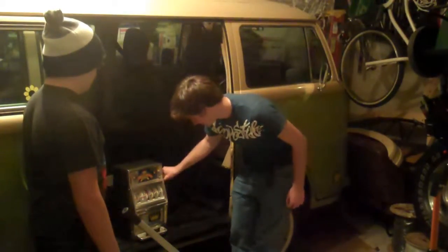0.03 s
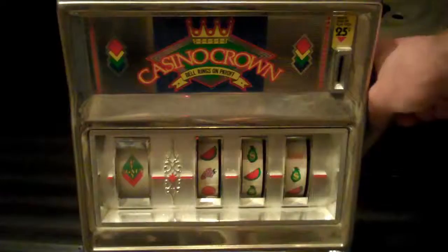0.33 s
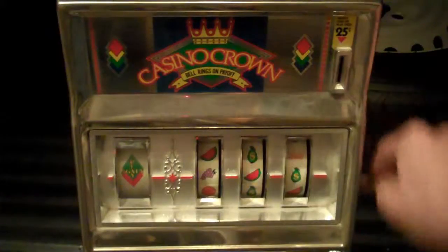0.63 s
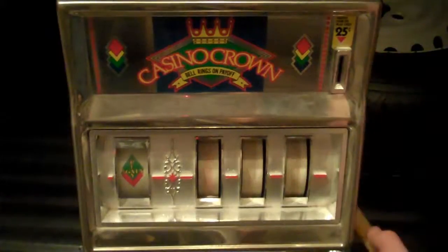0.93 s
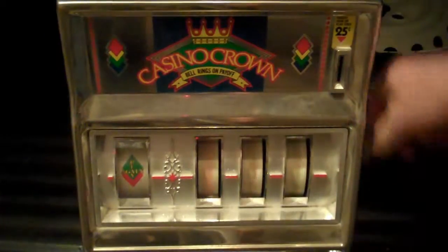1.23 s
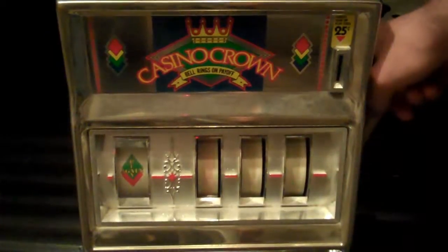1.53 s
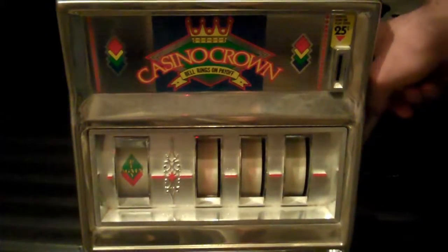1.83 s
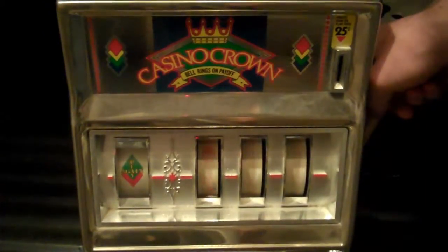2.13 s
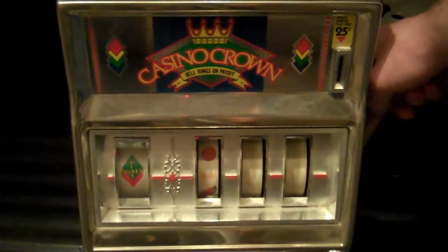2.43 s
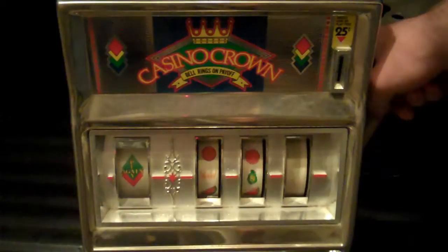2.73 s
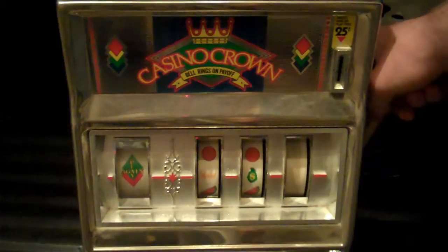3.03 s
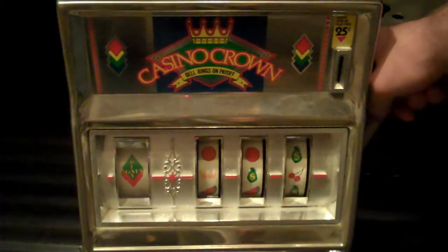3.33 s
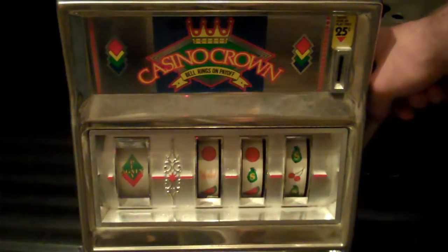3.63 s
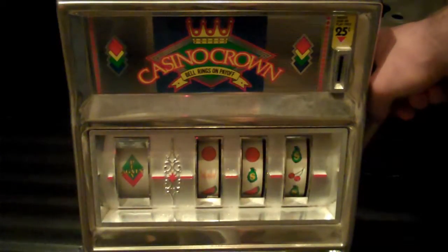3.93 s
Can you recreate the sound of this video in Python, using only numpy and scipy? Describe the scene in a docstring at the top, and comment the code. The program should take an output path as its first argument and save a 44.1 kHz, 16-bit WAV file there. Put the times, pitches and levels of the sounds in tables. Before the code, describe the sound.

A small mechanical slot machine is played, heard close in a quiet garage. From 0.5 seconds the lever ratchets with tiny spring pings, tripping with a loud clack near 0.9. A bright, rattling whirr rises with a thin squeal, and the lever rubs and knocks back at 1.3. Three reels stop in turn with slowing ticks starting around 2, 2.4 and 3 seconds, while the whirr continues to 4.

```python
"""A garage, with a stereo microphone close to a small mechanical slot machine; the left side is brighter.
The lever ratchets down, trips the spring with a clack, then rubs and knocks back home.
Three reels whirr on a squealing shaft. One by one each ticks against its pawl, ever slower,
and rocks to rest. Ticks and blows ring the cabinet; the loudest peaks overload the microphone."""
import sys
import numpy as np
from scipy import signal
from scipy.fft import rfft, irfft
from scipy.io import wavfile

SR = 44100
rng = np.random.default_rng(int(sys.argv[2]) if len(sys.argv) > 2 else 0)


def store_wav(level_fs):
    """Save 16-bit WAV to argv[1]."""
    pcm = np.round(np.clip(np.atleast_2d(level_fs), -1, 1) * 32767)
    wavfile.write(sys.argv[1], SR, pcm.T.astype(np.int16))


N = 176400

# The stereo image at the microphone. Each row: frequency in Hz, left over right in dB.
LEFT_LEAN = [(60, 1), (200, 4), (1000, 4.7), (2000, 3.2), (3200, 4.7), (5300, 1.8), (6200, 0.54),
             (7200, 19.2), (9000, 15.2), (13500, 25)]
# How alike the two sides are. Each row: frequency in Hz, coherence from 0 to 1.
COHERENCE = [(60, 0.25), (200, 0.84), (700, 0.87), (1900, 0.81), (3100, 0.59), (5000, 0.53), (8200, 0.6),
             (13500, 0.42)]
# The garage's background. Each row: frequency in Hz, relative level in dB.
ROOM_COLOUR = [(15, -43), (25, -24), (65, -5), (99, -9), (159, -7), (187, -12), (263, -5.5), (300, -11),
               (325, -10), (988, -9.5), (1770, -15.5), (13900, -28)]
# Faint whines in the garage. Each row: frequency in Hz, width in Hz, lift in dB.
ROOM_WHINES = [(4550, 65, 6), (8320, 72, 10)]

# Blows of lever, ratchet and spring. Each row: start in seconds, then body, clack, snap and sizzle
# in relative dB.
LEVER_BLOWS = [(0.5, -39.5, -42, -35, -65), (0.604, -37, -33, -20.5, -39.5), (0.617, -34.5, -41, -21, -51),
               (0.656, -45, -54, -40, -72), (0.697, -33, -26, -28, -52), (0.723, -38, -37, -23, -53),
               (0.738, -35.5, -27, -28, -44), (0.763, -32.5, -46, -29, -42), (0.776, -38, -61, -30, -42),
               (0.79, -34.5, -31, -22.5, -37), (0.826, -26.5, -24, -17.5, -21),
               (0.851, -21.5, -28, -8.5, -30), (0.859, -18.5, -10, -1, -26), (0.879, -30, -19, -5, -17.5),
               (1.302, -29.5, -18, -9, -25.5), (1.306, -29, -22, -8.5, -24.5)]
# The centres of those four bands, in Hz.
LEVER_BANDS_HZ = [900, 2800, 6000, 11500]
# The spectrum of a lever blow. Each row: frequency in Hz, relative level in dB.
LEVER_COLOUR = [(35, -25), (60, -13), (210, -15), (573, -6.5), (883, 0), (1270, -4), (2150, -4),
                (2350, -0.5), (3880, -7), (5460, -2.5), (6410, -4.5), (7350, -1), (9880, -15.5),
                (13900, -22.5)]
# The lever's resonances. Each row: frequency in Hz, width in Hz, lift in dB.
LEVER_RESONANCES = [(1023, 75, 4.6), (2410, 58, 2.4), (5870, 140, 3.8), (6670, 110, 4.7), (7430, 150, 3.2)]
# The cabinet's modes. Each row: pitch in Hz, seconds to fall 60 dB, then the dB added to the body level
# of a tick and of a lever blow.
CABINET_MODES = [(125.5,0.45,-25.5,-18),(221,0.27,-16.5,-14),(421.6,0.18,-15,-11),(757,0.075,15,0)]
# The mechanism's rumble. Each row: time in seconds, relative level in dB.
RUMBLE_LEVELS = [(.55,-56.5),(.72,-44.5),(.9,-41),(1.1,-48),(1.38,-46.5),(1.85,-55.5),(2.15,-42.5),(2.36,-49.5),(2.6,-42.5),(2.93,-51.5),(3.15,-47),(3.5,-57),(4,-57)]
# Its spectrum. Each row: frequency in Hz, relative level in dB.
RUMBLE_COLOUR = [(30,-25),(80,-27),(118,-3.5),(162,-14.5),(217,2),(330,-11.5),(440,-3),(700,-22),(1500,-52)]
# The spring's pings. Each row: start in seconds, pitch in Hz, level in dB.
SPRING_PINGS = [(0.617,7870,-17.5),(0.655,7800,-24.5),(.724,5060,-21),(0.727,5940,-28),(0.762,7500,-23),(0.785,2980,-26),(0.794,8000,-19),(0.836,7540,-12)]
# Dull low thumps that come with the loudest hits. Each row: start in seconds, level in dB.
THUMPS = [(0.861,-21.5),(0.878,-27),(1.985,-30.5),(2.009,-29.5),(2.058,-36),(2.461,-34),(2.521,-34),(3.015,-41)]
# Their spectrum. Each row: frequency in Hz, relative level in dB.
THUMP_COLOUR = [(25, -10), (200, -1.5), (450, -6.5), (1500, -19.5)]

# The whirr's level as heard, drawn to duck after loud hits and recover as a recorder's automatic
# gain control does. Each row: time in seconds, relative level in dB.
WHIRR_HEARD_LEVELS = [(.86,-76),(1,-34),(1.26,-19.5),(1.37,-25.5),(1.52,-16),(1.94,-17),(1.965,-24),(2.07,-34.5),(2.28,-25.5),(2.43,-21),(2.6,-31.5),(2.8,-26),(2.99,-16),(3.12,-27.5),(3.24,-26.5),(3.48,-18),(3.8,-16.5),(4,-18.5)]
# The whirr's spectrum. Each row: frequency in Hz, relative level in dB.
WHIRR_COLOUR = [(300,-40),(700,-20.5),(1600,-21.5),(2400,-15.5),(3000,-15),(4400,-9.5),(5200,-3.5),(6900,1),(8600,-8),(11000,-19),(14000,-23)]
# Its resonances. Each row: frequency in Hz, width in Hz, lift in dB.
WHIRR_RESONANCES = [(2480, 150, 5), (3450, 250, 4), (5400, 200, 4), (6500, 280, 4), (7100, 380, 4.5),
                    (10950, 350, 6.5)]
# The shaft's two squeals. Each row: time in seconds, level in dB.
HIGH_SQUEAL = [(.9,-70),(1,-41),(1.12,-34),(1.15,-28),(1.25,-24.5),(1.28,-33),(1.4,-70)]
LOW_SQUEAL = [(1.05, -56), (1.17, -41), (1.28, -30.5), (1.36, -45), (1.48, -37), (1.69, -45), (1.9, -47),
              (2.0, -60)]
# The rub of the returning lever. Each row: time in seconds, level in dB.
RUB_LEVELS = [(.92,-43),(1.05,-52),(1.165,-49),(1.195,-37),(1.23,-34),(1.27,-44.5),(1.31,-34.5),(1.4,-49)]
# Its spectrum. Each row: frequency in Hz, relative level in dB.
RUB_COLOUR = [(400, -30.5), (700, -5), (800, 8.5), (1200, 4), (1500, 7), (2500, -1.5), (5000, -13.5)]

# When each reel starts to brake, in seconds.
REEL_BRAKES_S = [1.9, 2.4, 2.95]
# Teeth hitting a pawl. Each row: start in seconds, body, clack and snap in relative dB, ring pitch in Hz.
TICKS = [(1.952, -43, -30, -12.5, 5840), (1.963, -34.5, -31, -15.5, 6060), (1.977, -38, -30, -18, 6140),
         (1.992, -34, -32, -20.0, 5700), (2.006, -47, -29, -19.5, 6380), (2.022, -39, -34.5, -32, 5800),
         (2.041, -39, -28.5, -26.5, 4680), (2.059, -48, -27, -22.5, 6050), (2.08, -53, -27, -27, 5970),
         (2.101, -42.5, -40, -29, 5850), (2.126, -45.5, -32.5, -28.5, 4740),
         (2.158, -41.5, -32, -28.5, 6030), (2.204, -46, -29.5, -29, 5610), (2.253, -42, -35, -22.5, 5700),
         (2.3, -37, -25, -26.5, 5620), (2.329, -40.5, -33.5, -28.5, 5870), (2.356, -39, -35.5, -39, 5870),
         (2.444, -34.5, -31.5, -14.5, 5660), (2.4575, -37, -29, -14.0, 5820),
         (2.472, -35, -28.5, -19.0, 5600), (2.49, -34.5, -30, -19.5, 5740), (2.506, -41, -28, -23, 5960),
         (2.525, -37, -27, -20.0, 5570), (2.545, -38, -26.5, -23, 5730), (2.568, -41, -28, -22.5, 4930),
         (2.593, -40.5, -31, -38, 6000), (2.62, -40.0, -29, -27.0, 5870), (2.659, -46, -33.0, -27.5, 5450),
         (2.724, -37.5, -29.5, -21.5, 6040), (2.779, -37, -29, -25, 4760), (2.816, -44.0, -36.5, -38, 6170),
         (2.852, -43, -34.5, -28, 4770), (3.001, -28.5, -25, -19, 5200), (3.013, -25.0, -26, -13, 5810),
         (3.025, -26.5, -24, -19.5, 5600), (3.04, -35.5, -31, -22, 5100), (3.056, -31.5, -27.5, -25, 5940),
         (3.074, -43, -30, -37, 4870), (3.095, -32.5, -28.5, -27.0, 5120), (3.118, -30.5, -27, -29.5, 6450),
         (3.143, -29.5, -28, -25.5, 5340), (3.177, -30.5, -24.5, -31, 5100),
         (3.244, -28.5, -30, -23.5, 6270), (3.297, -34.5, -27, -38, 5700), (3.327, -32, -33.5, -28.5, 6000),
         (3.357, -40, -30.5, -36, 5800), (3.371, -30.5, -36, -44, 6450)]
# The centres of those three bands, in Hz.
TICK_BANDS_HZ = [900, 2800, 6000]
# The spectrum of a tick. Each row: frequency in Hz, relative level in dB.
TICK_COLOUR = [(59, -34), (100, -40), (259, -15.5), (416, -17), (578, -19), (757, -9.5), (1000, -7),
               (1300, -14), (1880, -14.5), (2360, -8), (2960, -9), (3700, -14), (5000, -3), (5900, 0),
               (7400, -9.5), (13900, -38.5)]
# Resonances, one list per reel and pawl. Each row: frequency in Hz, width in Hz, lift in dB.
REEL_RESONANCES = [
    [(2530, 80, 6), (2980, 110, 9), (3980, 50, 11), (7200, 200, 8)],
    [(2370, 50, 7), (2760, 250, 7), (4250, 40, 13), (6250, 140, 5)],
    [(2420, 50, 8), (2980, 70, 10), (3530, 40, 14), (5050, 160, 5)],
]

BLOW_SIZE = 16384  # samples
BLOW_TIME = np.arange(BLOW_SIZE) / SR
SAME_RING = 0.37  # share of the dense ring that repeats from blow to blow
TREBLE_HZ, TREBLE_T60_RATIO, GARAGE_T60_S = 4200, .5, 0.53


def from_db(db):
    """Decibels as gain."""
    return 10 ** (np.asarray(db) / 20)


def rms_one(x):
    """Scale to an rms of 1."""
    return x / np.sqrt(np.mean(x ** 2) + 1e-20)


def level(rows):
    """Gain along a curve of seconds and dB, silent before it starts."""
    s, db = np.transpose(rows)
    return from_db(np.interp(np.arange(N) / SR, s, db, left=-120))


def bins(size):
    """FFT frequencies in Hz, floored at 1."""
    return np.maximum(np.arange(size // 2 + 1) * SR / size, 1)


def at_hz(points, hz):
    """Read a curve along a log frequency axis."""
    knots_hz, values = np.transpose(points)
    return np.interp(np.log(hz), np.log(knots_hz), values)


def colour(points, resonances, hz):
    """A smooth spectrum with resonant peaks on it, as gain."""
    peaks = sum((from_db(2 * db) - 1) / (1 + (2 * (hz - f) / width) ** 2) for f, width, db in resonances)
    return from_db(at_hz(points, hz)) * np.sqrt(np.maximum(1 + peaks, .1))


def drift(rate_hz):
    """A random wander of rms 1, mostly slower than the given rate."""
    return rms_one(irfft(rfft(rng.standard_normal(N)) / (1 + (bins(N) / rate_hz) ** 2), N))


def add(out, s, sound):
    """Mix a sound in, starting at s seconds."""
    i = int(s * SR)
    out[:, i:i + sound.shape[1]] += sound[:, :N - i]


def tone_at_mic(tone, hz):
    """A tone reaches the microphone leaning left by an amount set by its pitch."""
    lean = from_db(at_hz(LEFT_LEAN, hz))
    return np.outer([lean, 1], tone) * 2 / (1 + lean)


def noise_at_mic(pair, gain):
    """Two unrelated signals, coloured and blended, reach the microphone's bright left and dull right."""
    size = pair.shape[1]
    hz = bins(size)
    alike = np.clip(at_hz(COHERENCE, hz), 0, .99)
    lean = from_db(at_hz(LEFT_LEAN, hz))
    # minimum phase, so nothing rings ahead of its blow
    cepstrum = irfft(np.log(gain + 1e-9), size)
    cepstrum[1:size // 2] *= 2
    cepstrum[size // 2 + 1:] = 0
    mid, side = rfft(pair) * np.exp(rfft(cepstrum)) * 2 / (1 + lean)
    side = side * np.sqrt((1 - alike) / (1 + alike))
    return irfft(np.array([lean * (mid + side), mid - side]), size)


def steady(points, resonances=(), drive=None, ripple_db=3.6):
    """Noise, or a given drive, coloured and rippled by the housing's many fine resonances."""
    drive = rng.standard_normal((2, N)) if drive is None else rms_one(drive)
    knots_hz = np.arange(0, SR / 2, 50)
    ripple = from_db(ripple_db * np.interp(bins(N), knots_hz, rng.standard_normal(len(knots_hz))))
    return noise_at_mic(drive, rms_one(ripple * colour(points, resonances, bins(N))))


def blows(rows, shape, bands_hz, t60, tail_db, attack_s):
    """Each blow sets off a dense, quickly dying ring and a faint garage tail; its band levels tint it."""
    out, t, hz = np.zeros((2, N)), BLOW_TIME, bins(BLOW_SIZE)
    t60 = t60 * np.array([[1], [TREBLE_T60_RATIO]])
    tail = from_db(tail_db - 60 * t / GARAGE_T60_S)
    envelope = (1 - np.exp(-t / attack_s)) * np.hypot(from_db(-60 * t / t60), tail)
    envelope *= np.sqrt(.02 * SR / np.sum(envelope ** 2, axis=1, keepdims=True))  # energy of 20 ms at 1
    shape_db = [10 * np.log10(np.mean(shape ** 2 * (abs(np.log2(hz / f)) < .5))) for f in bands_hz]
    shared_ring = rng.standard_normal((2, BLOW_SIZE))
    for s, *band_db in rows:
        fresh_ring = rng.standard_normal((2, BLOW_SIZE))
        ring = np.sqrt(SAME_RING) * shared_ring + np.sqrt(1 - SAME_RING) * fresh_ring
        tint = from_db(np.interp(np.log(hz), np.log(bands_hz), np.subtract(band_db, shape_db)))
        low = irfft(rfft(ring) * (hz < TREBLE_HZ))
        add(out, s, noise_at_mic(low * envelope[0] + (ring - low) * envelope[1], shape * tint))
    return out


def ping(hz, db, t60, split_hz=200, attack_s=0.00096):
    """A small steel part rings with a close pair of modes."""
    t = BLOW_TIME
    pair = np.sin(2 * np.pi * hz * t) + 0.64 * np.sin(2 * np.pi * (hz + split_hz) * t)
    return tone_at_mic(pair * (1 - np.exp(-t / attack_s)) * from_db(db - 60 * t / t60), hz)


def room_tone():
    """The quiet garage behind the machine, with two faint whines."""
    return from_db(-57.5) * steady(ROOM_COLOUR, ROOM_WHINES)


def lever():
    """Ratchet clicks, the spring's clack and the knock of the returning lever."""
    shape = colour(LEVER_COLOUR, LEVER_RESONANCES, bins(BLOW_SIZE))
    clacks = blows(LEVER_BLOWS, shape, LEVER_BANDS_HZ, t60=0.17, tail_db=-25.5, attack_s=0.00037)
    return from_db(-4.5) * clacks


def cabinet(attack_s=.005):
    """Every tick and lever blow also rings the cabinet's low modes."""
    out, t = np.zeros((2, N)), BLOW_TIME
    for hz, t60, tick_db, lever_db in CABINET_MODES:
        envelope = from_db(-60 * t / t60) * (1 - np.exp(-t / attack_s))
        ring = tone_at_mic(np.sin(2 * np.pi * hz * t) * envelope, hz)
        for rows, mode_db in ((TICKS, tick_db), (LEVER_BLOWS, lever_db)):
            for s, body_db, *_ in rows:
                start = s + rng.uniform(0, 0.0013)
                add(out, start, ring * from_db(body_db + mode_db + rng.normal(0, 0.95)))
    return out


def rumble():
    """The moving mechanism rumbles low."""
    return from_db(-1.5) * level(RUMBLE_LEVELS) * steady(RUMBLE_COLOUR)


def spring():
    """The spring pings as the lever goes down."""
    out = np.zeros((2, N))
    for s, hz, db in SPRING_PINGS:
        add(out, s, ping(hz, db, t60=.045))
    return out


def whirr(rattles_per_s=4500, gain_db=-3, wobble_db=1.33):
    """Thousands of tiny rattles a second in the spinning works; the level heard dips after loud hits."""
    rattles = (rng.random((2, N)) < rattles_per_s / SR) * rng.choice([-1, 1], (2, N))
    rattles = rattles * from_db(-2 * np.minimum(rng.exponential(1, (2, N)), 4))  # up to 8 dB softer
    gain = level(WHIRR_HEARD_LEVELS) * from_db(gain_db + wobble_db * drift(rate_hz=27.7))
    return gain * steady(WHIRR_COLOUR, WHIRR_RESONANCES, rattles)


def thumps(t60=0.2):
    """Dull low thumps come with the loudest hits."""
    out = np.zeros((2, N))
    dull = rms_one(colour(THUMP_COLOUR, (), bins(BLOW_SIZE)))
    for s, db in THUMPS:
        burst = rng.standard_normal((2, BLOW_SIZE)) * from_db(db - 60 * BLOW_TIME / t60)
        add(out, s, noise_at_mic(burst, dull))
    return out


def housing_hum(start_s=.872, hz=217, db=-22, t60=0.36, attack_s=.01):
    """The housing hums after the spring trips, a little left of centre."""
    out, t = np.zeros((2, N)), BLOW_TIME
    envelope = (1 - np.exp(-t / attack_s)) * from_db(db - 60 * t / t60)
    add(out, start_s, np.outer([1.2, .8], np.sin(2 * np.pi * hz * t) * envelope))
    return out


def shaft_squeal(curve, hz, waver_share=9 / 3280, flutter_db=1.5):
    """Friction on the spinning shaft sings a thin, wavering tone."""
    pitch_hz = hz * (1 + waver_share * drift(rate_hz=160))
    phase = 2 * np.pi * np.cumsum(pitch_hz) / SR
    flutter = from_db(flutter_db * drift(rate_hz=24))
    return tone_at_mic(np.sin(phase) * level(curve) * flutter, hz)


def lever_rub():
    """The lever rubs on its way back."""
    return level(RUB_LEVELS) * steady(RUB_COLOUR)


def pawls(body_trim_db=-6, tooth_lift_db=7):
    """The three reels tick to rest in turn, each with its own resonances; every tooth rings briefly."""
    out, ticks = np.zeros((2, N)), np.array(TICKS)
    ticks[:, 1] += body_trim_db
    reel = np.searchsorted(REEL_BRAKES_S, ticks[:, 0]) - 1
    for k, resonances in enumerate(REEL_RESONANCES):
        shape = colour(TICK_COLOUR, resonances, bins(BLOW_SIZE))
        out += blows(ticks[reel == k, :-1], shape, TICK_BANDS_HZ, t60=.075, tail_db=-20, attack_s=.0007)
    for s, *_, snap_db, hz in TICKS:
        add(out, s, ping(hz, snap_db + tooth_lift_db, t60=.05))
    return from_db(1.5) * out


def scene():
    """One pull of the lever, heard from close by over the room tone."""
    spin = whirr() + rumble()
    friction = shaft_squeal(HIGH_SQUEAL, hz=8120) + shaft_squeal(LOW_SQUEAL, hz=3280) + lever_rub()
    strikes = lever() + spring() + pawls()
    low_end = cabinet() + thumps() + housing_hum()
    return spin + friction + strikes + low_end + room_tone()


def record(dry, overload=0.96, cutoff_hz=14250):
    """The microphone clips on the loudest peaks, and the top treble is cut."""
    lowpass = signal.ellip(10, .1, 70, cutoff_hz, fs=SR, output="sos")
    return signal.sosfilt(lowpass, np.clip(dry, -overload, overload))


dry = scene()
out = record(dry)
store_wav(out)
```